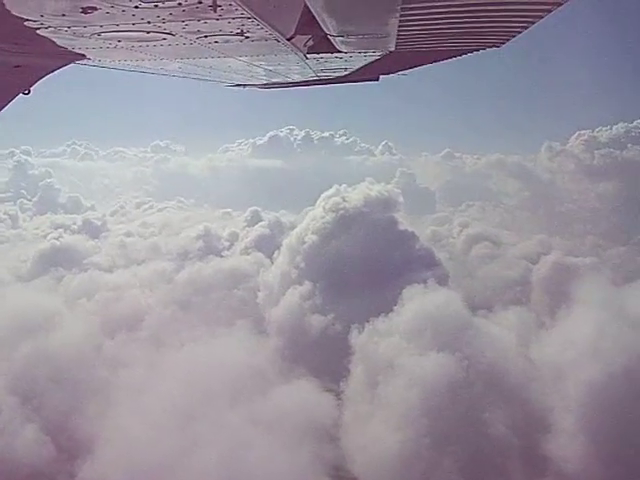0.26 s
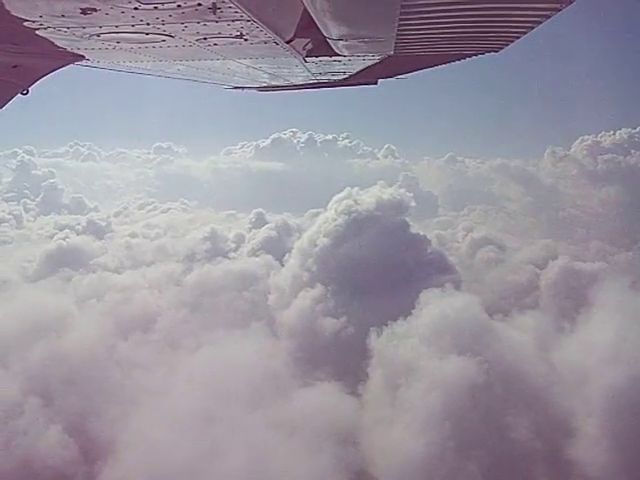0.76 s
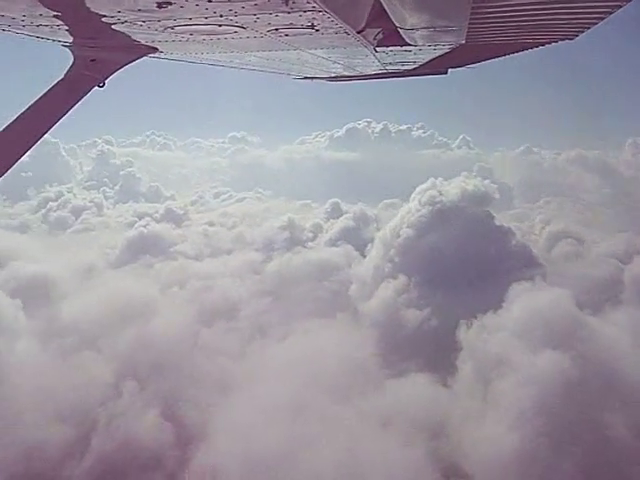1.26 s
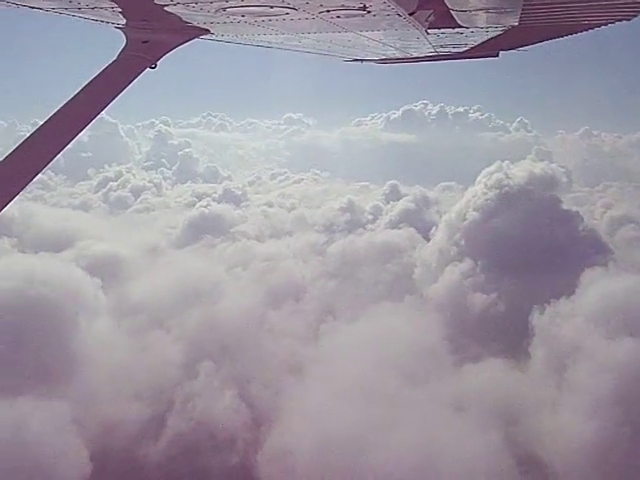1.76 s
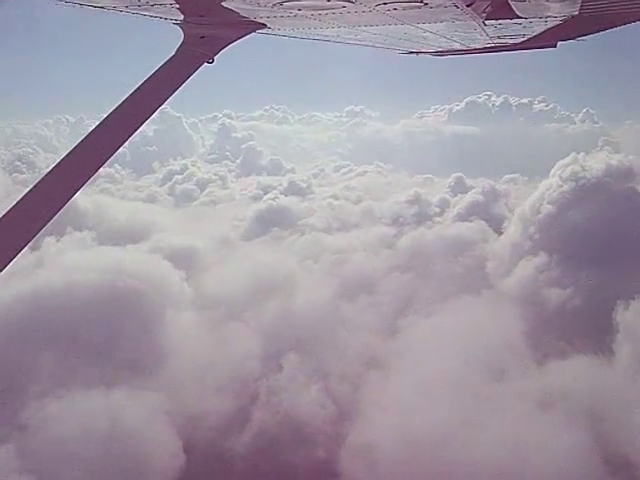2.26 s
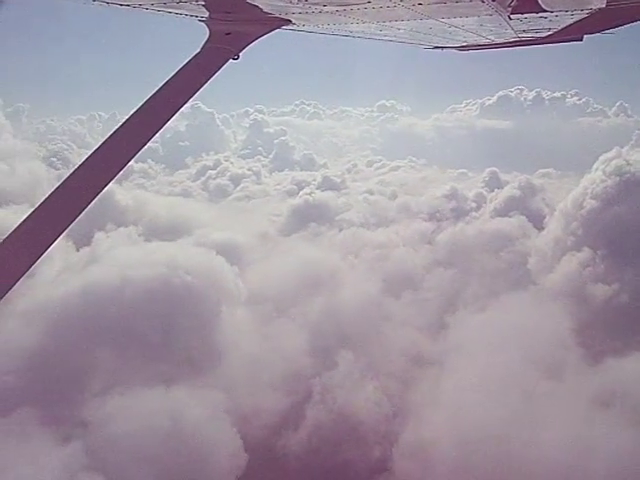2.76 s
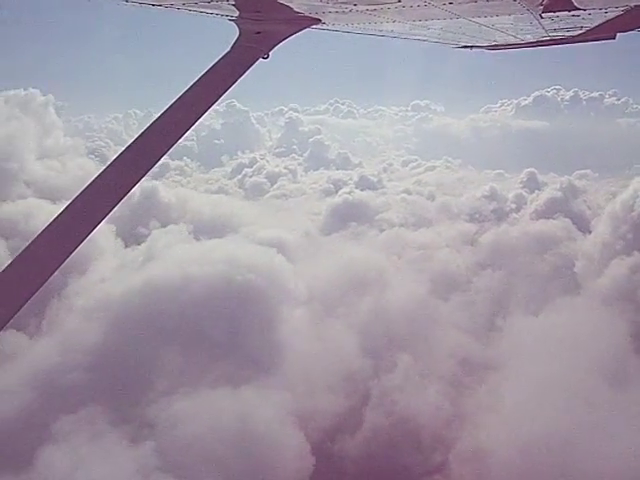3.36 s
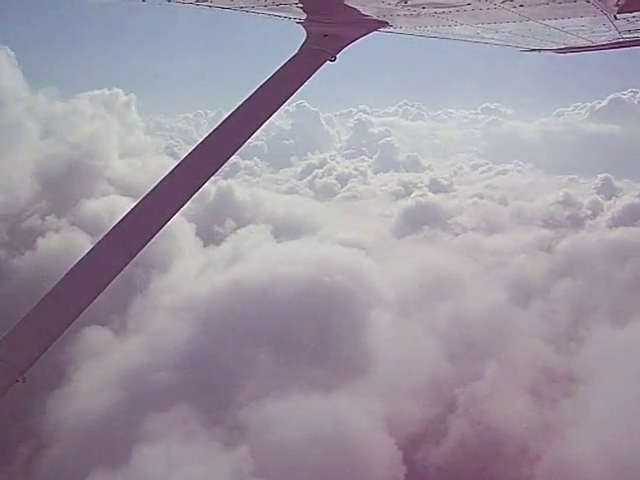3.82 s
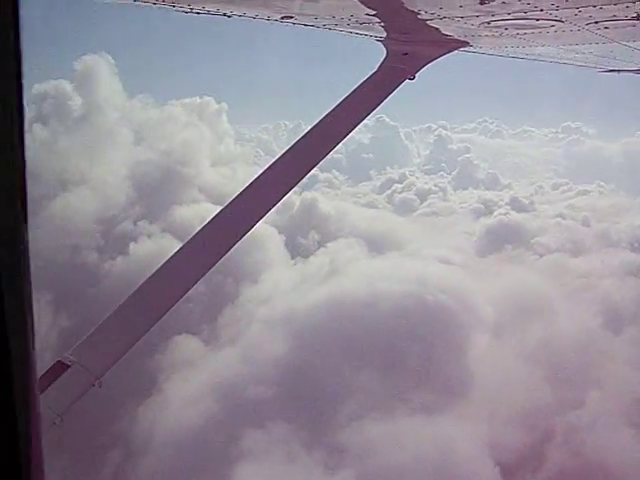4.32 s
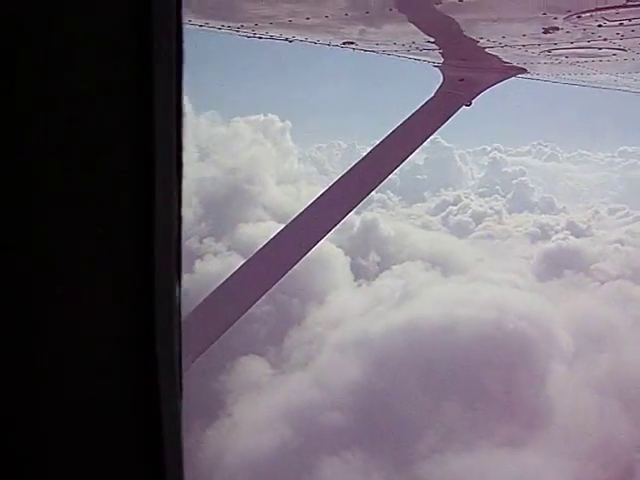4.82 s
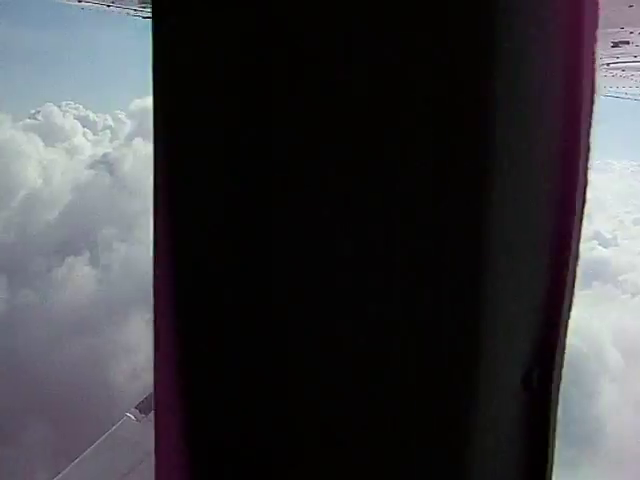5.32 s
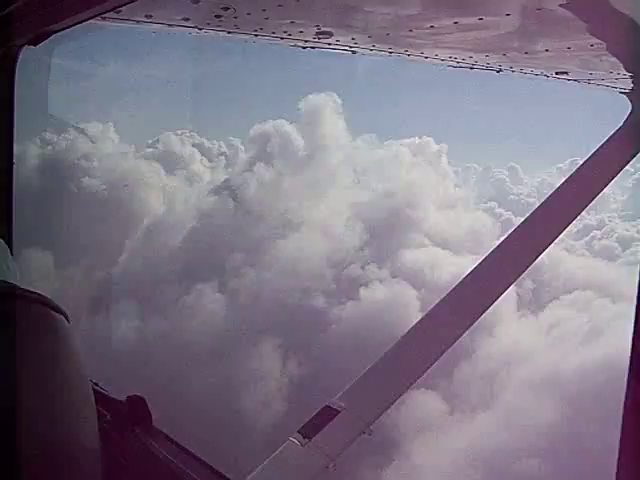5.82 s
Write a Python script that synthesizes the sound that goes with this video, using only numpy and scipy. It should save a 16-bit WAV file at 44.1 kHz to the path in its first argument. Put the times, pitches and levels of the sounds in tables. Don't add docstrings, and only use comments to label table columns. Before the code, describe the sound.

From 0 seconds, the cabin of a small aircraft is filled by a deep, constant drone from a piston engine and propeller, its pitch rising almost imperceptibly through six seconds. A slow, uneven shake throbs beneath. Dense low wind rumble buffets the cabin, with a thin mid-range roar through its skin and a faint hiss of leaking air above. For about 3.5 seconds little changes. From around 4 to 5 seconds, as the camera turns towards the door post, the sound grows hollower, the drone's upper buzz thins, and the airy seal noise becomes clearer with a broad, breathy singing. From about 5.3 seconds soft puffs of air start, strongest near 5.6 to 5.7, then continue irregularly to the end at 6.1, over a slightly fuller rumble. The small camera microphone sounds compressed, with limited treble.

```python
import sys
import numpy as np
from scipy import signal
from scipy.fft import rfft, irfft, next_fast_len
from scipy.io import wavfile
from scipy.ndimage import uniform_filter1d, map_coordinates

SR = 44100
rng = np.random.default_rng(int(sys.argv[2]) if len(sys.argv) > 2 else 0)


def how_loud(loudness_db):
    steps = np.asarray(loudness_db, float) / 20
    return 10 ** steps


def output_pcm(signal):
    pcm = np.clip(np.atleast_2d(signal).T, -1, 1) * 32767
    wavfile.write(sys.argv[1], SR, np.round(pcm).astype(np.int16))


N = 268128

# (time [s], rate [Hz])
CYCLE_RATE = [
    (0, 19.28),
    (3.3, 19.317),
    (6.08, 19.37),
]
# (order [-], rms level [dB])
ENGINE_HARMONICS = [(1, -33.8), (4, -17.7), (5, -37.7), (8, -21.2), (9, -34.1), (11, -39.1), (12, -40.1),
                    (13, -44.1), (14, -46.7), (16, -46.2), (17, -48.7), (18, -50.2), (20, -47.0),
                    (22, -52.3), (24, -40.5), (25, -51.4), (26, -54.2), (28, -47.2), (29, -52.0),
                    (30, -53.7), (32, -47.3), (33, -55.1), (37, -55.3), (40, -51.3), (41, -50.0),
                    (43, -55.3), (44, -47.3), (48, -53.1), (60, -61.5)]
# (frequency [Hz], rms level [dB])
AIRFRAME_SHAKE = (20.15, -37)
# (frequency [Hz], density [dB per Hz])
BUFFET_SPECTRUM = [(12, -11), (30, -10.5), (45, -0.7), (66, 2.5), (86, -2), (130, -4.5), (200, -8),
                   (280, -12), (430, -16.5), (700, -21.5), (900, -19.5), (1100, -32)]
# (frequency [Hz], width [Hz], level [dB])
CABIN_MODES = [
    (34, 8, 3),
    (84, 9, -3),
    (110, 10, -1.5),
    (130, 12, 1.5),
    (155, 12, -2.5),
    (196, 14, 3.5),
    (230, 16, 1.5),
    (292, 18, 2),
    (345, 18, 1.5),
    (420, 22, 1.5),
]
# (frequency [Hz], density [dB per Hz])
SKIN_SPECTRUM = [(530, -32), (900, -8), (1090, -4.5), (1990, -8), (2130, -11.5), (2790, -9), (3330, -9),
                 (3560, -12.5), (3980, -28), (4300, -28.5), (5590, -58.5), (9460, -120)]
# (frequency [Hz], density [dB per Hz])
SEAL_SPECTRUM = [(900, -41.5), (1500, -13.5), (2900, 4.5), (3500, -22.5), (3900, -30.5), (4200, -22.5),
                 (4600, -7), (5300, -1.5), (6400, -2), (7500, 1.5), (8000, -4.5)]
# (time [s], turn [0 = out of the window, 1 = at the door post])
CAMERA_PAN = [
    (0, 0),
    (3.8, 0.5),
    (4.4, 0.67),
    (4.9, .8),
    (5.3, 1.01),
    (5.6, 1.2),
    (6.08, 1.4),
]
# (frequency [Hz], width [Hz])
PANEL_MODES = [
    (3510, 120),
    (720, 54),
    (280, 130),
]
# (rest level [dB], change [dB], centre [turns], spread [turns])
PANEL_SHADE = [
    (0.5, -8, .68, .4),
    (0.7, 5.5, .9, .6),
    (0.53, 0.4, 1.05, 0.32),
]
# (time [s], peak level [dB])
GAP_PUFFS = [
    (5.3, -42.5),
    (5.43, -43.5),
    (5.485, -36.5),
    (5.63, -32),
    (5.705, -32.5),
    (5.79, -38.5),
    (5.86, -34.5),
    (5.955, -35),
    (6.05, -36.5),
]
# (frequency [Hz], density [dB per Hz])
PUFF_SPECTRUM = [(600, -43), (1100, -10), (1500, 1), (1950, 2), (2900, -1), (3500, -10.5), (3900, -12),
                 (4250, -32), (4800, -20.5), (7500, -4), (8000, -17)]
# (frequency [Hz], gain [dB])
OUTPUT_FILTER = [(7000, 1.5), (7700, 3.5), (8000, 5.5), (8300, -5), (8800, -25), (8960, -33), (9150, -65),
                 (9400, -120)]

THIN_TURN, THIN_SPREAD = 0.7, 0.05
THIN_DB, UPPER_THIN_DB, PUFF_DUCK_DB = -1, -3, -2
BUFFET_DB, BUFFET_POST_DB, BUFFET_TURN, BUFFET_SPREAD = -23, 1.4, 1.13, 0.14
HISS_DB, HISS_GROWS_DB, HISS_PUFF_DB = -39.5, 3, 0.5
SONG_DB, SONG_FAR_DB, SONG_TURN, SONG_SPREAD = -45, -54.5, 0.93, 0.33
HOLLOW_HZ, HOLLOW_SLIDE_HZ, HOLLOW_LOWEST_HZ = 1750, 700, 850
HOLLOW_REST_DB, HOLLOW_DEEP_DB, HOLLOW_TURN, HOLLOW_SPREAD = -0.9, -5, 0.94, 0.19
PUFF_RISE_S, PUFF_FALL_S = 0.045, 0.03
CAMERA_RATE_HZ, INPUT_LIMIT = 16000, 0.495


def unit(x):
    return x / np.sqrt(np.mean(x ** 2) + 1e-20)


def bump(x, centre, width):
    return np.exp(-((x - centre) / width) ** 2)


def along(points, hz):
    f, v = np.transpose(points)
    return np.interp(np.log(hz + 1), np.log(f + 1), v)


def over_time(rows, t=None):
    s, values = np.transpose(rows)
    return np.interp(np.arange(N) / SR if t is None else t, s, values)


def wobble(rate):
    knots = rng.standard_normal(int(N * rate / SR) + 4)
    return map_coordinates(knots, [np.arange(N) * rate / SR])


def filtered(x, response):
    m = next_fast_len(N + 8192)
    return irfft(rfft(x, m) * response(np.fft.rfftfreq(m, 1 / SR)), m)[:N]


def rush(spectrum, patchy_db):
    z = signal.stft(rng.standard_normal(N), nperseg=512)[2]
    field = uniform_filter1d(rng.standard_normal(z.shape), size=6, axis=0)
    field = uniform_filter1d(field, size=14, axis=1)
    noise = signal.istft(z * how_loud(patchy_db * unit(field)), nperseg=512)[1][:N]
    return unit(filtered(noise, lambda hz: how_loud(along(spectrum, hz))))


def cycle_phase():
    return 2 * np.pi * np.cumsum(over_time(CYCLE_RATE)) / SR


def engine():
    phase = cycle_phase()
    puffs = puffing()
    shaded = 0.5 + 0.5 * np.tanh((over_time(CAMERA_PAN) - THIN_TURN) / THIN_SPREAD)
    all_db = THIN_DB * shaded + PUFF_DUCK_DB * puffs / puffs.max()
    upper_db = UPPER_THIN_DB * shaded
    set_phases = {4: 0, 5: 0, 8: np.pi / 2, 9: -3 * np.pi / 4}
    drone = np.zeros(N)
    for order, db in ENGINE_HARMONICS:
        start = set_phases.get(order, rng.uniform(0, 2 * np.pi))
        flicker_db = np.clip(0.1 * max(order - 7, 0) * wobble(5), -7, 3)
        level_db = db + flicker_db + upper_db * (order > 20)
        drone += np.sqrt(2) * how_loud(level_db) * np.cos(order * phase + start)
    return how_loud(all_db) * drone


def airframe():
    hz, db = AIRFRAME_SHAKE
    phase = 2 * np.pi * hz * np.arange(N) / SR + 0.9 * wobble(1.9)
    return np.sqrt(2) * how_loud(db + 1.8 * wobble(1.8)) * np.cos(phase)


def buffeting():
    spectrum = [(2, -63), (9, -26.5)] + BUFFET_SPECTRUM + [(1500, -36), (3000, -120)]
    low = rush(spectrum, patchy_db=0.5)
    low = filtered(low, lambda hz: how_loud(sum(db * bump(hz, c, w) for c, w, db in CABIN_MODES)))
    upper = filtered(low, lambda hz: np.clip((hz - 250) / 100, 0, 1))
    beat_db = 0.27 * np.cos(4 * cycle_phase() - 1.5)
    low = low + upper * (how_loud(beat_db) - 1)
    post_db = BUFFET_POST_DB * bump(over_time(CAMERA_PAN), BUFFET_TURN, BUFFET_SPREAD)
    return how_loud(BUFFET_DB + post_db + 0.2 * wobble(1.6)) * low


def skin_roar(flutter):
    return how_loud(-36.5 + 0.48 * wobble(3.99) + 0.5 * flutter) * rush(SKIN_SPECTRUM, patchy_db=1)


def position(x):
    hz, t, z = signal.stft(x, SR, nperseg=1024)
    hz = hz[:, None]
    turn = over_time(CAMERA_PAN, t)
    centre = np.maximum(HOLLOW_HZ - HOLLOW_SLIDE_HZ * turn ** 3, HOLLOW_LOWEST_HZ)
    depth_db = HOLLOW_REST_DB + HOLLOW_DEEP_DB * bump(turn, HOLLOW_TURN, HOLLOW_SPREAD)
    colour_db = depth_db * bump(hz, centre, 370)
    for (rest_db, change_db, at, spread), (mode_hz, width_hz) in zip(PANEL_SHADE, PANEL_MODES):
        panel_db = rest_db + change_db * bump(turn, at, spread)
        colour_db = colour_db + panel_db * bump(hz, mode_hz, width_hz)
    return signal.istft(z * how_loud(colour_db), SR, nperseg=1024)[1][:N]


def seal_hiss(flutter):
    puffs = puffing()
    hiss_db = HISS_DB + HISS_GROWS_DB * over_time(CAMERA_PAN) + HISS_PUFF_DB * puffs / puffs.max()
    return how_loud(hiss_db + 0.16 * flutter + 0.59 * wobble(60)) * rush(SEAL_SPECTRUM, patchy_db=0.27)


def gap_song(flutter):
    def resonance(f):
        return 1j * f * 350 / (2080 ** 2 - f * f + 1j * f * 350)

    song = unit(filtered(rng.standard_normal(N), lambda f: resonance(f) ** 2))
    offset = (over_time(CAMERA_PAN) - SONG_TURN) / SONG_SPREAD
    facing = np.exp(-offset ** 4)
    return (how_loud(SONG_FAR_DB) + how_loud(SONG_DB) * facing) * how_loud(0.42 * flutter) * song


def puffing():
    s, db = np.transpose(GAP_PUFFS)
    late = np.arange(N) / SR - s[:, None]
    return how_loud(db) @ bump(late, 0, np.where(late < 0, PUFF_RISE_S, PUFF_FALL_S))


def gap_puffs():
    return puffing() * rush(PUFF_SPECTRUM, patchy_db=-0.5)


def scene():
    flutter = wobble(18)
    cabin = position(engine() + airframe() + buffeting() + skin_roar(flutter))
    draught = seal_hiss(flutter) + gap_song(flutter) + gap_puffs()
    return (cabin + draught)[None]


def roll_off(x):
    return signal.sosfilt(signal.butter(12, 9310, fs=SR, output="sos"), x)


def record(dry):
    limited = np.clip(dry[0], -INPUT_LIMIT, INPUT_LIMIT)
    kept = filtered(limited, lambda hz: hz < CAMERA_RATE_HZ / 2)
    mirror = 2 * kept * np.cos(2 * np.pi * CAMERA_RATE_HZ * np.arange(N) / SR)
    smooth = filtered(kept + mirror, lambda hz: how_loud(along(OUTPUT_FILTER, hz) - along(OUTPUT_FILTER, 0)))
    return roll_off(smooth[None])


dry = scene()
out = record(dry)
output_pcm(out)
```